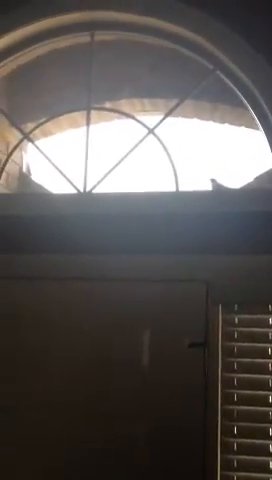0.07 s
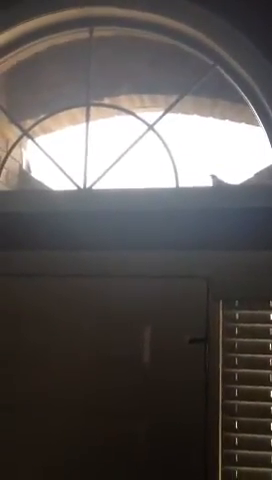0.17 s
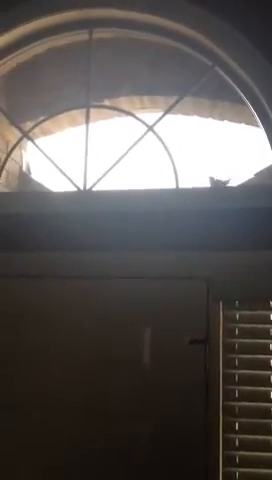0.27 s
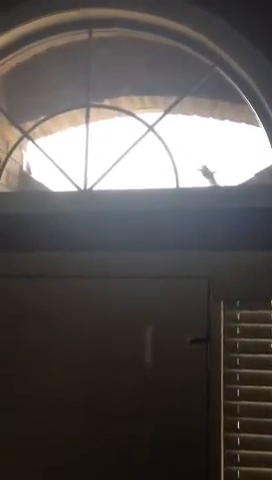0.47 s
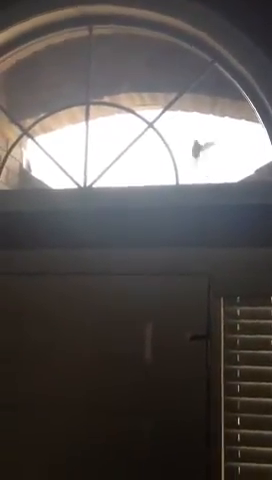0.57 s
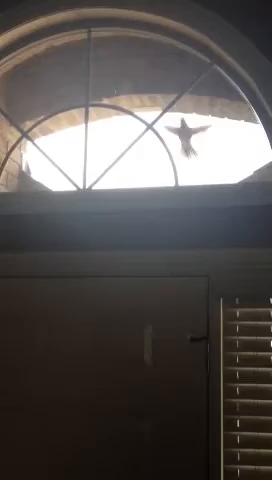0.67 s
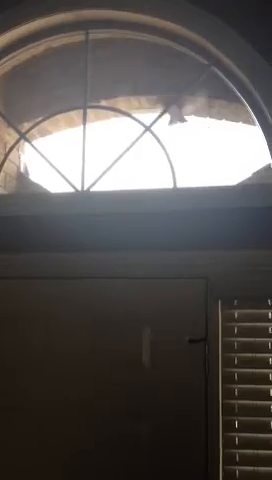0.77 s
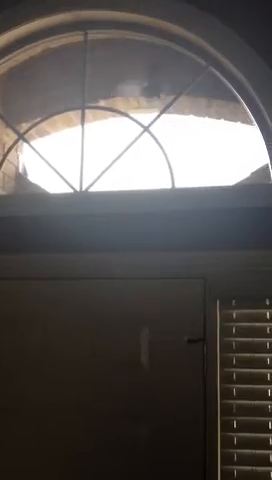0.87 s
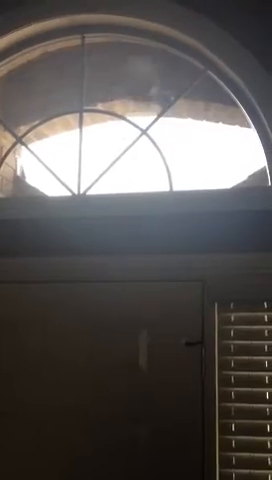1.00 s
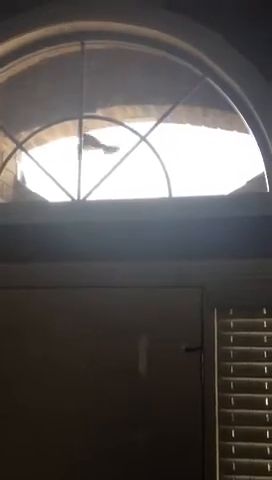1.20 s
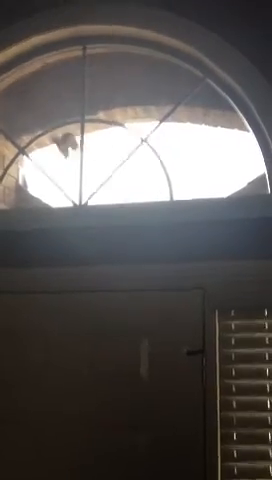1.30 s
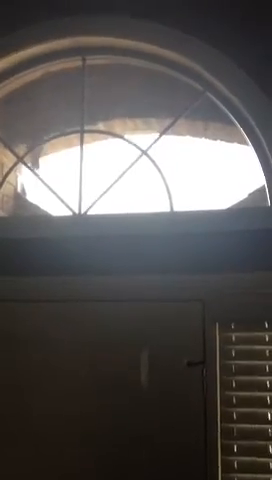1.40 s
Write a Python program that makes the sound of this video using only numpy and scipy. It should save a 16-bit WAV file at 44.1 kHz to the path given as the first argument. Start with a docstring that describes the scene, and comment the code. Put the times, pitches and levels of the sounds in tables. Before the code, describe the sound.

A small bird hits a window with one dull thump and a brief scuff, ringing in a quiet, bare hallway. Two faint, dry handling knocks on the microphone come first, and soft wing rustle follows.

```python
"""In a quiet, bare hallway, a small bird flutters at a high window and strikes the glass once.
The pane thumps and rings, feathers and claws scuff it, and the hall rings on.
Faint wing rustle comes before and after, over soft air noise and a wavering hum.
Before the strike, a hand rumbles on the camera, and two dry knocks travel
straight through its body to the microphone."""
import sys
import numpy as np
from scipy import signal
from scipy.fft import rfft, irfft, next_fast_len
from scipy.io import wavfile
from scipy.ndimage import map_coordinates

SR = 44100
rng = np.random.default_rng(int(sys.argv[2]) if len(sys.argv) > 2 else 0)


def to_wav(sig):
    """Store sig (one row per channel, or 1-D mono) as 16-bit WAV at the path in sys.argv[1].

    Samples outside -1..1 are clipped; the rate is SR.
    """
    pcm = np.clip(np.atleast_2d(sig), -1, 1) * 32767
    pcm = np.round(pcm).astype(np.int16)
    wavfile.write(sys.argv[1], SR, pcm.T)  # frames by channels


N = 63945


def amp(db):
    """Turn decibels into a number to multiply by."""
    return 10 ** (np.asarray(db) / 20)

def unit(x):
    """Scale a sound to an average (rms) level of 1."""
    return x / np.sqrt(np.mean(x ** 2) + 1e-20)

def along(points, hz):
    """Read between rows of (frequency, value), on a log frequency scale."""
    freqs, values = np.transpose(points)
    return np.interp(np.log(hz + 1), np.log(freqs + 1), values)

def since(start):
    """Seconds since the start, zero before it."""
    return np.maximum(np.arange(N) / SR - start, 0)

def decay(t, fade_s):
    """Fade away. A fade time is how long a sound takes to drop 60 dB."""
    return np.exp(-np.log(1000) * t / fade_s)

def wobble(rate):
    """A smooth curve through `rate` random points a second."""
    return map_coordinates(rng.standard_normal(int(N * rate / SR) + 4), [np.arange(N) * rate / SR])

def filtered(x, response):
    """Multiply each frequency in x by response(hz)."""
    size = next_fast_len(N + SR // 2)
    return irfft(rfft(x, size) * response(np.fft.rfftfreq(size, 1 / SR)), size)[:N]

def noise(colour):
    """Noise at level 1; its colour says how strong each frequency is."""
    return unit(filtered(rng.standard_normal(N), lambda hz: amp(along(colour, hz))))


# The colour of the air. Each row: frequency in Hz, relative level in dB.
AIR_COLOUR = [(25, -43.5), (70, -37), (95, -19), (130, -11), (160, -11), (205, -1), (235, -5), (270, -5),
              (320, -12), (410, -10), (480, -15), (660, -17), (900, -21.5), (1500, -27), (4100, -29),
              (7000, -32.5), (10000, -37.5), (13500, -32), (15300, -33)]
# The tones of the hum. Each row: pitch in Hz, level in dB.
HUM_TONES = [(200, -77), (377, -83.5), (415, -82), (996, -88.5)]

def room_tone(air_db=-67.5, waver_radians=1.6):
    """Quiet air with a wavering hum."""
    t = since(0)
    hum = sum(amp(db) * unit(np.sin(2 * np.pi * hz * t + waver_radians * wobble(rate=12)))
              for hz, db in HUM_TONES)
    return amp(air_db) * noise(AIR_COLOUR) + hum


# How loud the hand is over time. Each row: time in seconds, level in dB.
HAND_LEVELS = [(0, -70.5), (.06, -66), (.13, -68.5), (0.229, -63.5), (.3, -90.5)]
# The colour of its rumble. Each row: frequency in Hz, relative level in dB.
HAND_COLOUR = [(40, -35.5), (100, -14), (170, -0.5), (260, -2.5), (500, -14.5), (1200, -25), (4000, -49.5)]

def hand_rumble():
    """A hand shifts on the camera with a faint rumble that dies away at the knocks."""
    times, levels_db = np.transpose(HAND_LEVELS)
    return amp(np.interp(since(0), times, levels_db)) * noise(HAND_COLOUR)


# Bursts of flapping. Each row: peak time in seconds, level in dB, rise and fall in seconds.
WING_FLURRIES = [(.02, -69, 0.09, .14), (1.168, -67.5, 0.026, 0.074)]
# The colour of the feathers. Each row: frequency in Hz, relative level in dB.
FEATHER_COLOUR = [(40, -31), (150, -2.5), (400, 5), (1000, -1), (1800, -3), (3200, 0.5), (5500, -8.5),
                  (9000, -12.5), (15000, -13.5)]

def wings(beat_hz=21.8, beat_depth_db=1):
    """Feathers rustle softly, swelling and fading, and pulse with each wingbeat."""
    t = since(0)
    swell = sum(amp(db) * np.exp(np.minimum((t - peak) / rise, (peak - t) / fall))
                for peak, db, rise, fall in WING_FLURRIES)
    wingbeat = amp(beat_depth_db * np.sin(2 * np.pi * beat_hz * t))
    return swell * wingbeat * noise(FEATHER_COLOUR)


# Where the camera's case rings or deadens. Each row: frequency in Hz, width in Hz, full boost or cut in dB.
CASE_BANDS = [(560, 120, 0.5), (785, 190, -3), (1200, 140, -4), (2000, 310, -4), (2260, 210, 3.5),
              (2920, 290, -5.5), (6675, 660, 4), (7160, 560, -4), (8030, 1600, 4.5), (10400, 990, 1),
              (12000, 1200, 9), (13400, 2100, 8)]

def through_case(hz, push_s, ring_amount):
    """How much of a short push gets through the case and the microphone's springy mount."""
    mount_hz, mount_width_hz = 164, 132  # the mount bounces once or twice
    low_hz, high_hz = 85, 205  # the case passes this range best
    w = 1j * hz  # a complex frequency carries timing as well as level
    push = np.sinc(hz * push_s)
    mount = w * w / (w * w + w * mount_width_hz + mount_hz ** 2)
    response = push * mount * w / (w + low_hz) / (1 + w / high_hz)
    for centre, width, db in CASE_BANDS:
        gain = amp(ring_amount * db / 2)
        off_centre = w * w + centre ** 2
        response *= (off_centre + w * width * gain) / (off_centre + w * width / gain)
    return response


# The knocks. Each row: start in seconds, strength in dB before the case softens it,
# length of the push in seconds, how fully the case rings from 0 to 1.
CASE_KNOCKS = [(0.2362, 16.5, 0.000084, 0.9), (0.2708, 29.5, 0.000095, 0.98)]
# The colour of the case's buzz. Each row: frequency in Hz, relative level in dB.
BUZZ_COLOUR = [(200, -23.5), (900, 0.5), (2000, -2), (3200, -2), (5000, -15.5), (7500, -23), (10000, -22),
               (13500, -17.5), (15500, -45)]

def handling_knocks(buzz_relative_db=-63.5):
    """Each knock rocks the microphone's mount and buzzes the case, with no echo from the hall."""
    out = np.zeros(N)
    for start, db, push_s, ring_amount in CASE_KNOCKS:
        t = since(start)
        click = signal.unit_impulse(N, round(start * SR))
        knock = filtered(click, lambda hz: through_case(hz, push_s, ring_amount))
        buzz = amp(buzz_relative_db) * noise(BUZZ_COLOUR) * (t > 0) * decay(t, fade_s=0.0084)
        out += amp(db) * (knock + buzz)
    return out


# How long the hall rings. Each row: frequency in Hz, fade time in seconds.
HALL_FADES = [(120, 0.86), (320, 0.61), (840, 0.78), (2200, 0.66), (4500, 0.65), (6500, 0.51), (9000, 0.47),
              (14000, 0.44)]

def hall_tail(colour, start):
    """Noise that is steady until the start, then dies in the hall, each frequency at its own speed."""
    hz, t, bands = signal.stft(noise(colour), SR, nperseg=256)
    fade_db = -60 * np.maximum(t - start, 0) / along(HALL_FADES, hz)[:, None]
    return signal.istft(bands * amp(fade_db), SR, nperseg=256)[1][:N]


# The bird touches the glass. Each row: start in seconds, thump and scuff levels in the hall in dB,
# rise in seconds.
BIRD_CONTACTS = [(0.83, -57.5, -70, 0.0006), (0.8342, -43, -56, 0.0013), (0.8416, -46.5, -60, 0.00091)]
# The body's dull thump, then the bright scuff of feathers and claws.
# Each row: frequency in Hz, relative level in dB.
THUMP_COLOUR = [(25, -65), (60, -50), (90, -27), (145, -14.5), (290, 0), (450, -7.5), (660, -3.5),
                (900, -12), (1300, -18.5), (1650, -25.5), (3000, -45), (8000, -66)]
SCUFF_COLOUR = [(60, -70), (400, -44), (1650, -20), (1950, -3.5), (2700, 1.5), (3250, -6.5), (3650, 4),
                (5000, -2), (6000, -9), (8300, -12.5), (9500, -20), (14000, -17.5), (15500, -38)]

def bird_strike(direct_boost_db=10.5):
    """A wing tip brushes the glass, then the body lands; the thump and scuff linger in the hall."""
    out = np.zeros(N)
    for start, thump_db, scuff_db, rise_s in BIRD_CONTACTS:
        t = since(start)
        direct_scuff = amp(direct_boost_db) * noise(SCUFF_COLOUR) * decay(t, fade_s=0.042)
        thump = amp(thump_db) * hall_tail(THUMP_COLOUR, start)
        scuff = amp(scuff_db) * (direct_scuff + hall_tail(SCUFF_COLOUR, start))
        out += (thump + scuff) * (1 - np.exp(-t / rise_s))
    return out


def ring(tones, start, rise_s, blur_radians, blur_rate):
    """Struck tones rise and fade; a random wobble stands for the hall blurring them."""
    t = since(start)
    out = np.zeros(N)
    for hz, db, fade_s in tones:
        phase = 2 * np.pi * (hz * t + rng.random()) + blur_radians * wobble(blur_rate)
        out += amp(db) * decay(t, fade_s) * np.sin(phase)
    return out * (1 - np.exp(-t / rise_s))


# The low tones of the pane and frame, then the high tones of the glass.
# Each row: pitch in Hz, relative level in dB, fade time in seconds.
PANE_TONES = [(159.9, -3.5, 0.37), (240, -7, 0.65), (290, -1.5, 0.82), (371, -4.5, 0.16), (402.5, -4, 0.55),
              (482, -9.5, 0.66), (599, -2.5, 0.31), (649, -2.5, 0.67), (741.5, -6.5, 0.66), (823, -6, 0.37),
              (916, -13.5, 0.56), (1104, -21, 0.43), (1232, -15, 0.73)]
GLASS_TONES = [(2503, -13, 0.16), (2945, -11, 0.14), (3530, -8, 0.054), (4095, -6, 0.11),
               (4610, -4.5, 0.056), (5044, -5, 0.058), (6960, -6, 0.012)]
# Claws and beak tick on the glass. Each row: start in seconds, overall gain in dB.
GLASS_TICKS = [(0.8368, -50.5), (0.8425, -47)]

def window_pane(body_db=-40.5):
    """The bird's body sets the window's low tones ringing; claws and beak start the high ones."""
    low = amp(body_db) * ring(PANE_TONES, start=0.8345, rise_s=0.01, blur_radians=0.25, blur_rate=25)
    high = sum(amp(db) * ring(GLASS_TONES, start, rise_s=0.001, blur_radians=0.92, blur_rate=180)
               for start, db in GLASS_TICKS)
    return low + high


def scene(strike_bass_cut_hz=97):
    """All the sounds meet at one microphone; the deepest bass of the strike is cut away."""
    bass_cut = signal.butter(4, strike_bass_cut_hz, "highpass", fs=SR, output="sos")
    window = signal.sosfilt(bass_cut, bird_strike() + window_pane())
    return (room_tone() + hand_rumble() + wings() + handling_knocks() + window)[None]

def record(dry, top_hz=15100):
    """The camera sharply cuts off the highest treble."""
    return filtered(dry[0], lambda hz: 1 / np.sqrt(1 + (hz / top_hz) ** 160))[None]


dry = scene()
out = record(dry)
to_wav(out)
```